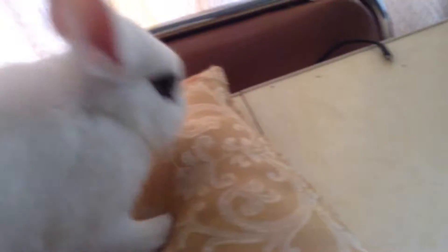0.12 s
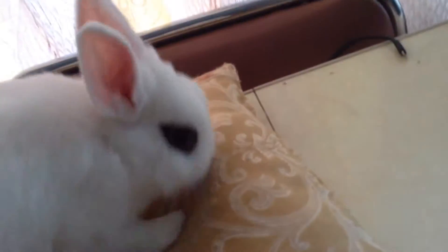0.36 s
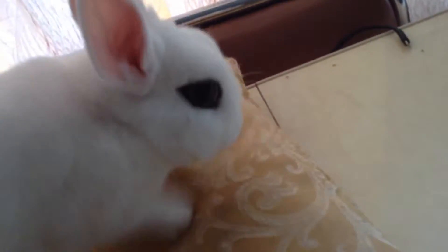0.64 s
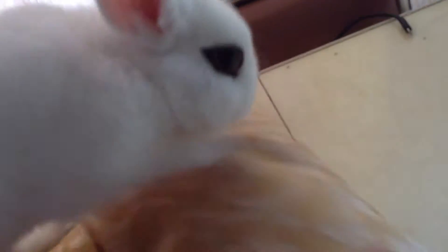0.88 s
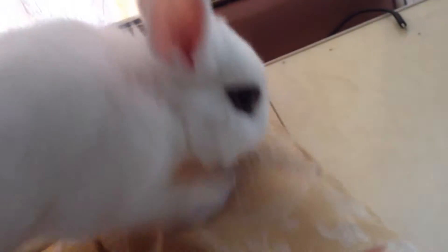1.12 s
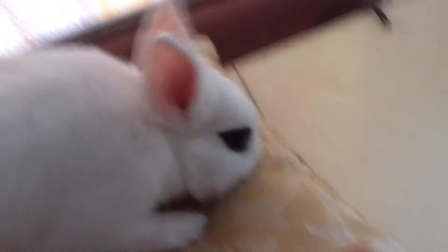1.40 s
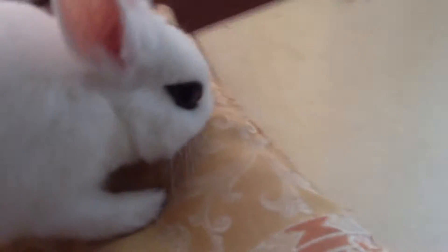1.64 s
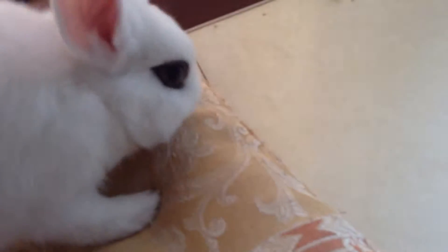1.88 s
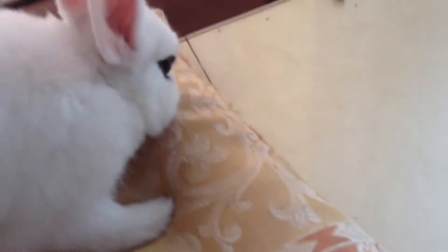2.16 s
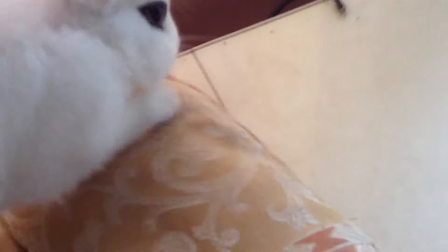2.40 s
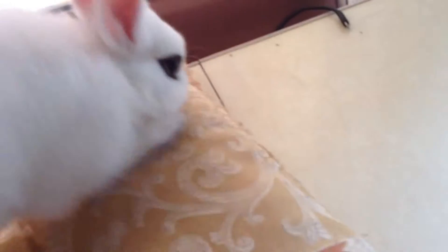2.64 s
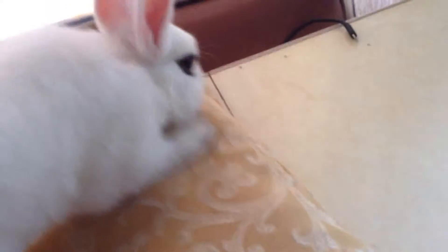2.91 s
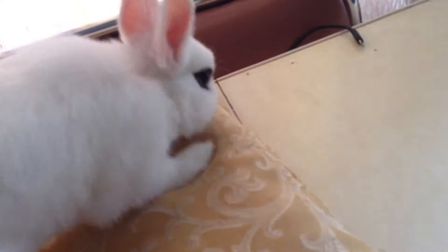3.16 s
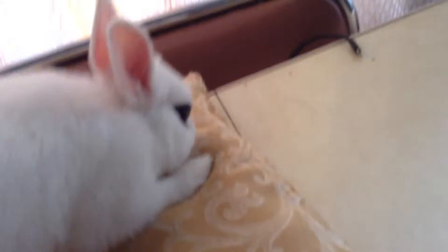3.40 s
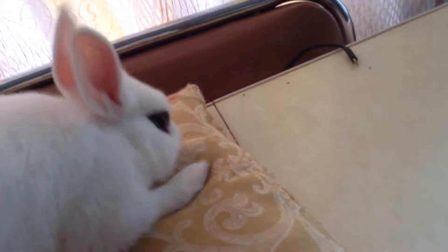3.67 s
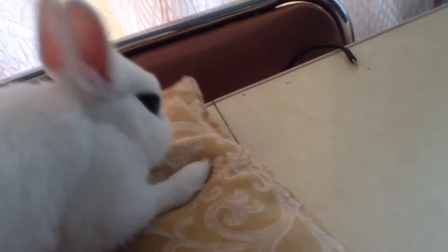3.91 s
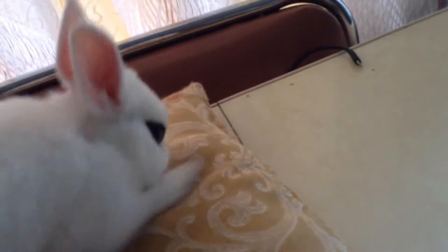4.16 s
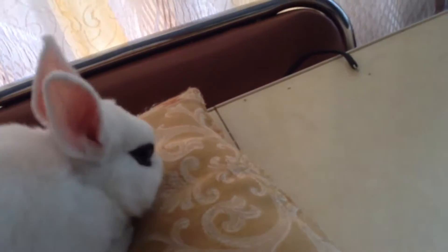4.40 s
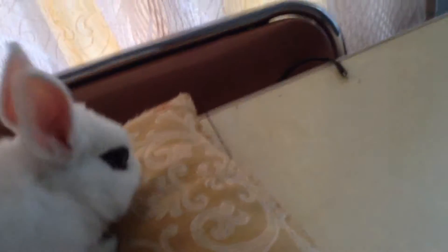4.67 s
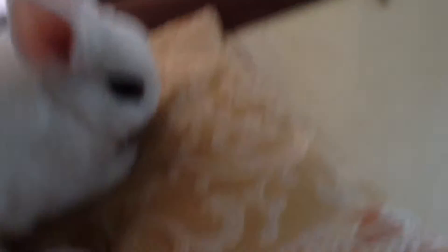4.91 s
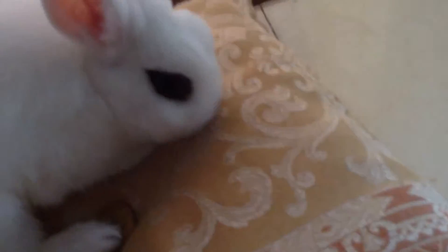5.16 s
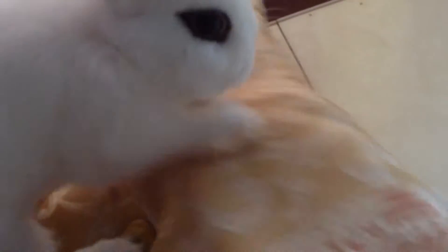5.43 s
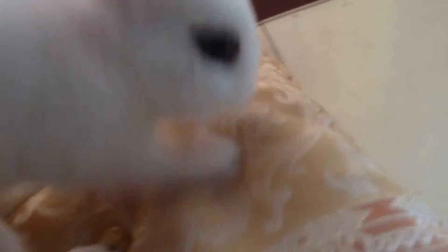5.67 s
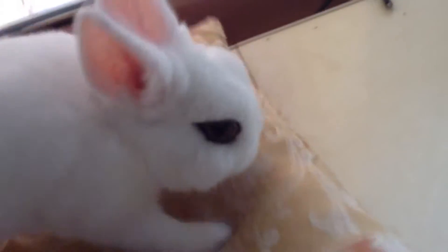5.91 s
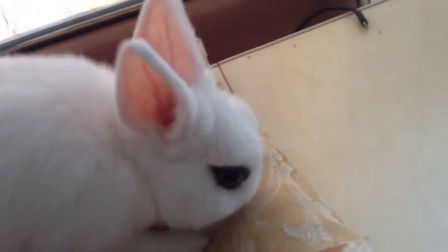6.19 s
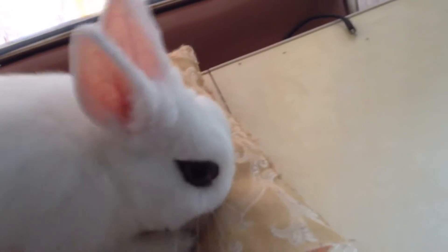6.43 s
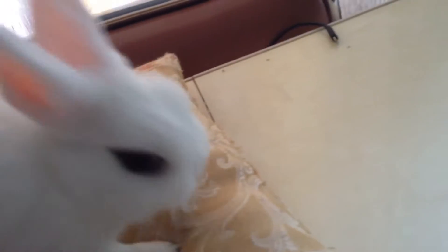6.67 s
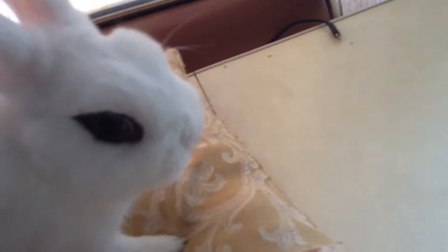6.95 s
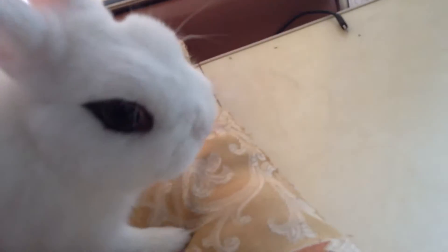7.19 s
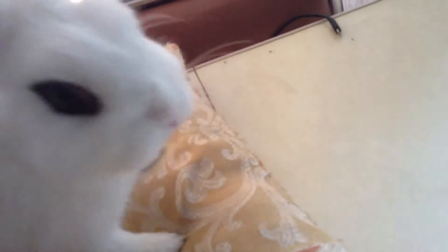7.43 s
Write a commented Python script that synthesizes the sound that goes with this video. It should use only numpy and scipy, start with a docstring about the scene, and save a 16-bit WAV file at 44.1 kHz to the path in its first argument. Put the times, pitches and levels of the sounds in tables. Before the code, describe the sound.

Small claws catch and drag over tight woven cloth, giving dry scratchy pops with a papery rasp and light padded thuds. They come in three main bursts with quieter gaps, where airy fur brushing and a few weak ticks remain. The sound is close and dry with a slight indoor echo, over faint hum and hiss, and the last burst is loudest.

```python
"""A rabbit paws at a fabric cushion on a table, close to a small microphone in a quiet room.
Claws snag and drag in the weave: random thread slips ring resonances of cover, weave, claw and padding.
Paw pads rub in clumps of dense slips; fur swishes over cloth as fluttering noise swells.
The paws excite short noise-tail echoes; mains sines and shaped noise form the room tone."""
import sys
import numpy as np
from scipy import signal
from scipy.fft import rfft, irfft, next_fast_len
from scipy.io import wavfile
from scipy.ndimage import uniform_filter1d, map_coordinates

SR = 44100
rng = np.random.default_rng(int(sys.argv[2]) if len(sys.argv) > 2 else 0)


def int16_out(signal):
    """Quantize to a 16-bit WAV file."""
    q = np.round(np.clip(np.atleast_2d(signal).T, -1, 1) * 32767)
    wavfile.write(sys.argv[1], SR, q.astype(np.int16))


def invert_db(x):
    """Field ratio 10**(x/20) for x, a level in decibels (scalar or array-like)."""
    u = np.asarray(x, float) / 20
    return 10 ** u


N = 333653

# claw strokes: (start [s], length [s], level [dB], weave rasp re cover [dB],
# claw tick re cover before a common trim [dB])
STROKES = [(0.083, 0.045, -63, -14, -10), (0.707, 0.044, -53.5, -9, -1), (0.792, 0.046, -54, -7, 0),
           (0.893, 0.03, -38, -13.5, -8), (0.931, 0.021, -40, -4.5, -5), (0.997, 0.019, -44, -19, -5),
           (1.068, 0.0084, -41.5, -11, 0), (1.102, 0.012, -38.5, -21, -9), (1.172, 0.039, -40.5, -14, -12),
           (1.207, 0.0037, -42, -9, 1), (1.288, 0.034, -43.5, -10, -9.5), (2.378, 0.038, -44.5, -10, -13),
           (2.43, 0.022, -43, -21, -14), (2.463, 0.061, -50, -17, -2), (2.558, 0.056, -39.5, -10.5, -11),
           (2.615, 0.053, -46, -29, -6), (5.435, 0.14, -56, -6, 0), (5.517, 0.027, -38.5, -10, -10),
           (5.582, 0.018, -30.5, -11, -25), (5.62, 0.032, -45, -6, -11), (5.667, 0.011, -62, -12, -12),
           (5.715, 0.033, -48.5, -8, -8), (5.777, 0.0092, -42, -6, 1.5), (5.789, 0.013, -36, -14, -13),
           (6.049, 0.081, -45, -6, -10), (6.084, 0.034, -41.5, -8, -11), (6.215, 0.0064, -61, 0, -5)]
# stretched cover modes: (centre [Hz], width [Hz], level [dB])
COVER_MODES = [(448, 92, -2), (780, 290, 0.5), (1548, 403, -0.5), (2146, 265, 0)]
# padding modes: (centre [Hz], width [Hz], level [dB])
PADDING_MODES = [(193, 62, 1.5), (318, 185, -2)]
# tight weave modes: (centre [Hz], width [Hz], level [dB])
WEAVE_MODES = [(2750, 1320, -3), (3530, 1210, 0.5), (4450, 1510, -6.5)]
# claw tip modes: (centre [Hz], width [Hz], level [dB])
CLAW_MODES = [(7840, 4300, -1), (9920, 2060, 3.5), (12130, 2100, -3)]


def unit(x):
    """Scale to rms 1."""
    return x / np.sqrt(np.mean(x ** 2) + 1e-20)


def along(points, hz):
    """Interpolate (frequency [Hz], value) points on a log frequency axis."""
    point_hz, value = np.transpose(points)
    return np.interp(np.log(hz + 1), np.log(point_hz + 1), value)


def curve(rows, outside=None):
    """Interpolate (time [s], value) rows to one value per sample."""
    time_s, value = np.transpose(rows)
    return np.interp(np.arange(N) / SR, time_s, value, outside, outside)


def wobble(knots_per_s):
    """Smooth random curve through normal-distributed knots."""
    knots = rng.standard_normal(int(N * knots_per_s / SR) + 4)
    return map_coordinates(knots, [np.arange(N) * knots_per_s / SR])


def filtered(x, response):
    """Apply a complex frequency response."""
    size = next_fast_len(len(x) + 8192)
    spectrum = rfft(x, size) * response(np.fft.rfftfreq(size, 1 / SR))
    return irfft(spectrum, size)[:len(x)]


def ringing(x, modes, soft_hz):
    """Drive parallel causal resonances; a soft contact rolls off above soft_hz."""
    def response(hz):
        total = 0
        for k, (centre_hz, width_hz, db) in enumerate(modes):
            damping = 1j * hz * width_hz
            mode = damping / (centre_hz ** 2 - hz ** 2 + damping)
            total = total + (-1) ** k * invert_db(db) * mode  # alternate polarity
        return total / (1 + 1j * hz / soft_hz) ** 2
    return filtered(x, response)


def rush(spectrum_db, patchy_db):
    """Shaped noise of rms 1 with random gain patches in time and frequency."""
    z = signal.stft(rng.standard_normal(N + 512), nperseg=512)[2]
    patches = uniform_filter1d(rng.standard_normal(z.shape), 8, axis=0)
    patches = unit(uniform_filter1d(patches, 8, axis=1))
    noise = signal.istft(z * invert_db(patchy_db * patches), nperseg=512)[1][:N]
    return unit(filtered(noise, lambda hz: invert_db(along(spectrum_db, hz))))


def slips(count, per_s, spread_db):
    """Threads letting go: random signed impulses, a few harder than the rest."""
    when, size, sign = rng.random((count, 3)).T
    strength = invert_db(-spread_db * np.log(size + 0.02))
    return (when < per_s / SR) * strength * np.sign(sign - 0.5)


def knock(modes, soft_hz):
    """One resonant blow of peak 1; where the paw lands sets each mode's strength anew."""
    here = [(hz, width_hz, db + 2 * rng.standard_normal()) for hz, width_hz, db in modes]
    blow = ringing(signal.unit_impulse(2048), here, soft_hz)
    return blow / np.abs(blow).max()


def room_tone():
    """Shaped air noise under mains sines with slightly unsteady level and phase."""
    # mains lines: (frequency [Hz], level [dB rms])
    mains = [(59.2, -82), (118.4, -69)]
    # room air and microphone hiss spectrum: (frequency [Hz], relative density [dB])
    air_spectrum = [(15, -81), (25, -48), (43, -23), (86, -25), (107, -12.5), (183, -1.5), (274, -3),
                    (305, -4.5), (552, -14), (997, -14.5), (1340, -18.5), (7700, -28.5), (9810, -28),
                    (14300, -45), (15500, -22)]
    t_s = np.arange(N) / SR
    hum = np.zeros(N)
    for hz, db in mains:
        level = invert_db(db + 0.8 * wobble(6)) * np.sqrt(2)
        hum += level * np.sin(2 * np.pi * hz * t_s + 0.3 * wobble(5))
    return hum + invert_db(-57 + 0.36 * wobble(1.26)) * rush(air_spectrum, patchy_db=0.62)


def room(x):
    """Wall echo: decaying noise, each frequency at its own speed, with a new tail every 0.25 s."""
    # reverberation: (frequency [Hz], t60 [s])
    decay = [(200, 0.49), (1500, 0.23), (5000, 0.24), (12000, 0.12)]
    out, hop = np.zeros(N + SR), SR // 4
    for at in range(0, N, hop):
        hz, t_s, z = signal.stft(rng.standard_normal(SR // 3), SR, nperseg=256)
        fade = invert_db(-60 * t_s / along(decay, hz)[:, None])
        tail = signal.istft(z * fade, SR, nperseg=256)[1]
        wet = signal.fftconvolve(x[at:at + hop], tail / np.linalg.norm(tail))
        out[at + 180:][:len(wet)] += wet  # delay in samples
    return out[:N]


def swish():
    """Fur brushing cloth: airy noise flutters, swelling and fading with each movement."""
    # movements: (peak time [s], rise [s], peak level before flutter [dB])
    movements = [(0.02, 0.0088, -49), (0.055, 0.012, -54), (0.087, 0.0094, -44), (0.127, 0.014, -49.5),
                 (0.207, 0.01, -56), (0.233, 0.014, -59.5), (0.29, 0.008, -54.5), (0.725, 0.078, -57),
                 (0.808, 0.06, -49), (0.89, 0.09, -52.5), (1.02, 0.07, -53), (1.1, 0.06, -54.5),
                 (1.205, 0.028, -51), (1.303, 0.029, -54.5), (1.45, 0.1, -59.5), (1.61, 0.12, -55),
                 (2.36, 0.01, -50), (2.39, 0.03, -50), (2.44, 0.08, -52), (2.5, 0.039, -52),
                 (2.576, 0.047, -45.5), (2.73, 0.11, -60), (2.854, 0.04, -60), (2.961, 0.07, -60.5),
                 (3.095, 0.09, -61), (3.366, 0.012, -59), (3.43, 0.08, -61), (3.871, 0.12, -66),
                 (4.302, 0.16, -62.5), (4.562, 0.025, -56.5), (4.779, 0.057, -57), (5.029, 0.047, -62),
                 (5.45, 0.025, -56), (5.49, 0.03, -55), (5.525, 0.03, -49), (5.6, 0.11, -51),
                 (5.729, 0.04, -55.5), (5.791, 0.04, -53), (5.93, 0.056, -53.5), (6.085, 0.05, -52.5),
                 (6.34, 0.15, -64)]
    # fur stirring between movements: (time [s], level before flutter [dB])
    stirring = [(0, -66), (0.6, -65.5), (1.8, -65.5), (3.5, -68), (6.4, -65), (7.56, -72.5)]
    # fur hiss spectrum: (frequency [Hz], relative density [dB])
    fur_spectrum = [(1760, -12), (3000, -14.5), (4140, -18), (4440, -11.5), (6940, -8), (11900, -1.5),
                    (14700, -4), (15500, -34.5)]
    fade_per_rise, swell_db = 1.34, 13  # fades slower than it rises; level gained over the rise
    t_s, power = np.arange(N) / SR, invert_db(curve(stirring)) ** 2
    for peak_s, rise_s, db in movements:
        near = slice(max(0, round((peak_s - 4 * rise_s) * SR)), round((peak_s + 5 * rise_s) * SR))
        away = np.maximum(peak_s - t_s[near], (t_s[near] - peak_s) / fade_per_rise) / rise_s
        power[near] += invert_db(db - swell_db * away ** 1.07) ** 2
    flutter = invert_db(0.94 * wobble(30))
    return np.sqrt(power) * flutter * rush(fur_spectrum, patchy_db=2.2)


def rubbing():
    """Paw pads over the weave: dense small slips ring the cloth in uneven clumps."""
    # one table a bout: (time [s], level before clumping [dB])
    bouts = [
        [(0.0, -59), (0.196, -60), (0.3, -70)],
        [(0.62, -75), (0.756, -56), (0.88, -57.5), (0.958, -53.5), (1.088, -57), (1.288, -76), (1.45, -59)],
        [(2.3, -83), (2.418, -50), (2.544, -57), (2.798, -70), (2.9, -77)],
        [(5.38, -70), (5.488, -55), (5.62, -59), (5.688, -52), (5.886, -58), (6.0, -66), (6.15, -57),
         (6.38, -68.5)],
    ]
    level = sum(invert_db(curve(rows, outside=-120)) for rows in bouts)
    grains = slips(count=N, per_s=2500, spread_db=1.5)
    grains = unit(ringing(grains, COVER_MODES + WEAVE_MODES + PADDING_MODES, soft_hz=2400))
    return level * invert_db(3.9 * wobble(45)) * grains


def strokes():
    """Claw drags: a run of slips starts fast, holds and fades, ringing cover, weave and claw."""
    out = np.zeros(N + SR)
    t_s = np.arange(SR // 6) / SR
    for start_s, length_s, db, rasp_db, tick_db in STROKES:
        hold = (1 - np.exp(-t_s / 0.0034)) / (1 + (t_s / (0.79 * length_s)) ** 6)
        drag = slips(count=len(t_s), per_s=800, spread_db=4)
        cover = unit(ringing(drag, COVER_MODES, soft_hz=4000))
        rasp = invert_db(rasp_db) * unit(ringing(drag, WEAVE_MODES, soft_hz=9000))
        tick = invert_db(tick_db - 3.5) * unit(ringing(drag, CLAW_MODES, soft_hz=18000))
        out[round(start_s * SR):][:len(t_s)] += invert_db(db) * hold * (cover + rasp + tick)
    return out[:N]


def snags():
    """Each catch plucks cover and weave, ticks, thuds and slips on; nearby strokes tighten the cover."""
    # claw snags: (time [s], cover pluck level [dB], padding thud re pluck [dB],
    # weave rasp re pluck [dB], claw tick re pluck [dB])
    catches = [(0.0644, -51, -7, -5, 18), (0.0706, -34, -11, -6, -2), (0.079, -48.5, 3, 10, 4),
               (0.0834, -21, -7, -10.5, -1.5), (0.21, -46.5, -1, -6, -6), (0.4003, -42.5, -4, -10, -4),
               (0.6997, -45, -23, -11, -13), (0.7146, -41, -8, -4, -9), (0.7519, -43, -4, -14, -6),
               (0.7891, -33.5, -24, -10, -8), (0.7941, -31, -13, -18, -10), (0.872, -31, 0.5, -2, 3.5),
               (0.8996, -28.5, -9.5, -15, -9), (0.9354, -24, -15, -19, -18), (0.9421, -31, -13, -7, -12),
               (0.9508, -29.5, -10, -22, -13), (0.9984, -33, -4.5, -19, -14), (1.0928, -31, -19, -2, -7),
               (1.1044, -31.5, -5.5, -3, -7), (1.12, -49, 5, -11, 12), (1.1952, -33.5, -3, 1, -1),
               (1.2023, -30, -12, -7, -11), (1.2135, -27, -13, -1, 3), (1.2932, -28.5, -10.5, -15, -14),
               (1.3689, -39.5, -29, -10, -12), (1.5186, -40, -6.5, -4, 1), (1.7297, -56, 11, 11, 12),
               (1.8712, -50.5, -21, -3, 8), (2.3774, -32, -0.5, -20, -14), (2.39, -31, -12, -15, -7),
               (2.4501, -29, -27, -18, -17), (2.4719, -38, -16, -2, -11), (2.488, -37, -3, -12, 1),
               (2.4922, -48, -1, 0, 14), (2.4981, -35, -9, 4.5, 6), (2.5064, -46, -11, -9, 18.5),
               (2.5148, -31.5, -32, -13, 0), (2.5585, -24.5, -6.5, -14, -5), (2.5669, -37.5, 4, 2, 12),
               (2.833, -39, -19, -12, -5), (3.368, -65, 6, -6, 18), (3.4682, -42.5, -10, -8, -12),
               (3.4933, -37.5, -11, -1, 4), (3.629, -53, -6, -2, 9), (3.6355, -38, -10, -5.5, -9),
               (3.7555, -41, -22, -0.5, 8), (3.988, -47.5, -12, -4, 1), (4.136, -48, 2.5, -4, -11),
               (4.5468, -34, -17, -10.5, -8), (4.556, -48, -10, -8, 4), (4.9156, -37, 2, 1.5, 1),
               (5.44, -38, -5, -19, -12), (5.485, -44, 1.5, -7, 0), (5.508, -43, -21, 6, 5),
               (5.519, -28, -6.5, -18, -12), (5.5263, -26, -7.5, -16, 0.5), (5.5301, -24.5, -16, -7, -11),
               (5.5838, -18.5, -17, -6.5, 0), (5.5891, -27.5, 1.5, -20, 4), (5.5935, -27, -1, -5, 2),
               (5.6354, -27, -5.5, -9, -10), (5.6756, -16, -13.5, -9.5, -14.5),
               (5.7075, -30.5, -13, -9, -19), (5.7778, -32.5, -14, -1, -5), (5.7912, -21, -14.5, -11, -4),
               (5.9155, -30, -9, -11, -3), (6.043, -41, -1, -1, -9), (6.0464, -36, -6, 1, -7),
               (6.0552, -24, -24, -4.5, -22), (6.0613, -29.5, -13, -1, -15), (6.0669, -30.5, -6, -3, -13),
               (6.0815, -22, -10.5, -6, -15), (6.0879, -21, -25, -16, -18), (6.0973, -24, -13, -18, -13),
               (6.1123, -33, -12, -7, -12), (6.218, -32, -24, -10, -4)]
    slack_hz, taut_hz = 906, 1194  # pluck pitch of the resting and the stretched cover
    tighten_db = -51  # stroke level that stretches it half way
    out, t_s = np.zeros(N + SR), np.arange(SR // 50) / SR
    stroke_s, _, stroke_db = np.transpose(STROKES)[:3]
    for snag_s, db, thud_db, rasp_db, tick_db in catches:
        nearness = np.exp(-((snag_s - stroke_s) / 0.066) ** 2)
        strain = np.sum(invert_db(stroke_db - tighten_db) * nearness)
        pluck_hz = slack_hz + (taut_hz - slack_hz) * strain / (1 + strain)
        pull = invert_db(-11 - 60 * t_s / 0.024) * slips(count=len(t_s), per_s=1200, spread_db=3.0)
        pull[0] = -1  # the claw catches and pulls
        # modes near the pluck pitch ring most
        plucked = [(hz, width_hz, mode_db - 9 * np.log2(hz / pluck_hz) ** 2)
                   for hz, width_hz, mode_db in COVER_MODES]
        blow = knock(plucked, soft_hz=4200)
        blow = blow + invert_db(rasp_db) * knock(WEAVE_MODES, soft_hz=6150)
        blow = blow + invert_db(tick_db) * knock(CLAW_MODES, soft_hz=18100)
        sound = signal.fftconvolve(pull, blow)
        sound[:len(blow)] += invert_db(thud_db) * knock(PADDING_MODES, soft_hz=925)
        out[round(snag_s * SR):][:len(sound)] += invert_db(db) * sound
    return out[:N]


def table_bounce(hz):
    """Response of the bounce off the table: a shallow dip at 5.7 kHz."""
    damping = 1j * hz * 1800
    return 1 - 0.15 * damping / (5700 ** 2 - hz ** 2 + damping)


def scene():
    """Paws on the cushion, their echo, fur and the quiet room."""
    paws = snags() + strokes() + rubbing()
    # a small cushion radiates little deep bass
    paws = filtered(paws, lambda hz: (1j * hz / (1j * hz + 70)) ** 2)
    near = paws + invert_db(-12.5) * room(paws) + swish()
    return (filtered(near, table_bounce) + room_tone())[None]


def top_cut(x):
    """Nothing passes above the cut-off."""
    return signal.sosfilt(signal.butter(12, 16500, fs=SR, output="sos"), x)


def record(dry):
    """The small microphone loses the deep bass; the top of the band drops sharply."""
    def microphone(hz):
        bass = (1j * hz / (1j * hz + 30)) ** 2
        return bass * np.where(hz > 15280, invert_db(-36), 1)
    mix = filtered(dry[0], microphone)[None]
    return top_cut(mix)


dry = scene()
out = record(dry)
int16_out(out)
```